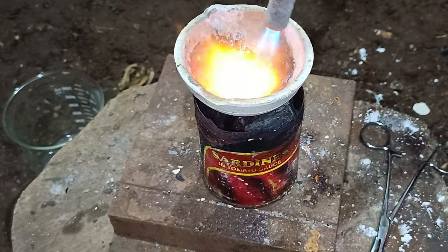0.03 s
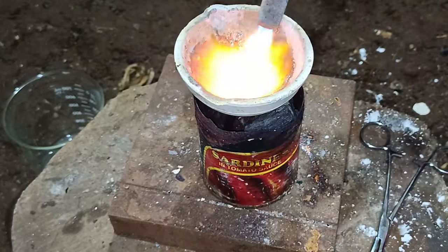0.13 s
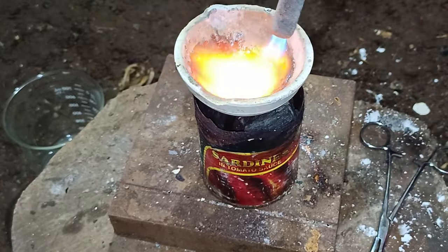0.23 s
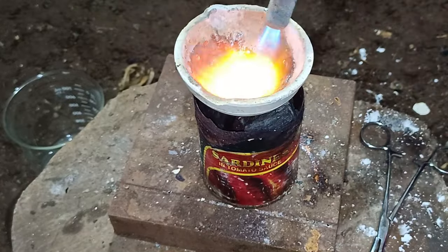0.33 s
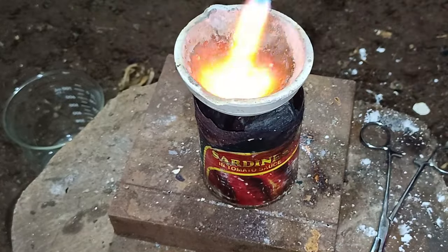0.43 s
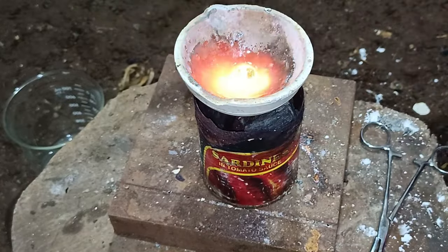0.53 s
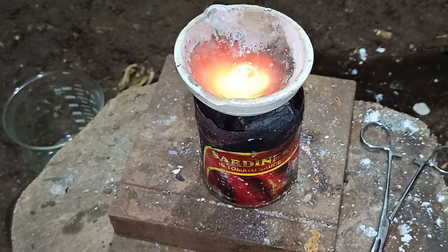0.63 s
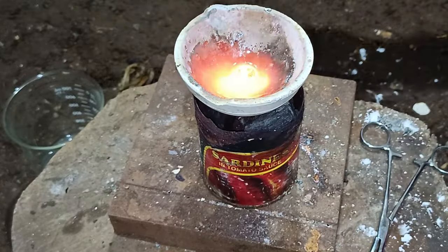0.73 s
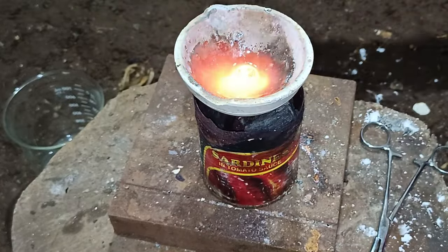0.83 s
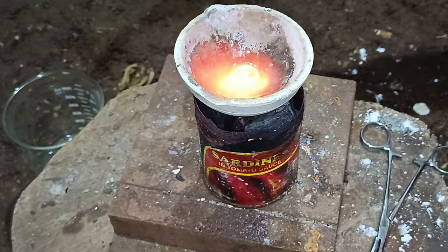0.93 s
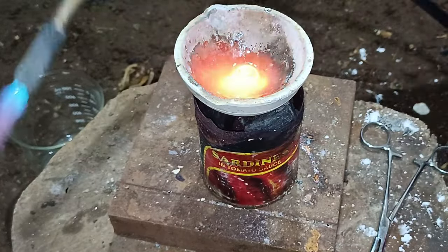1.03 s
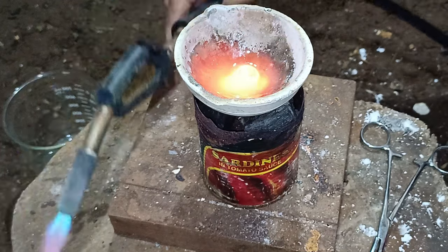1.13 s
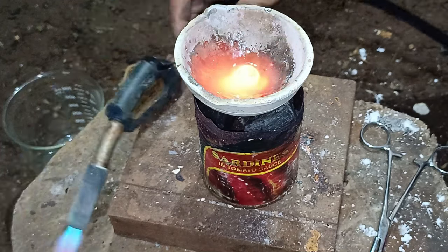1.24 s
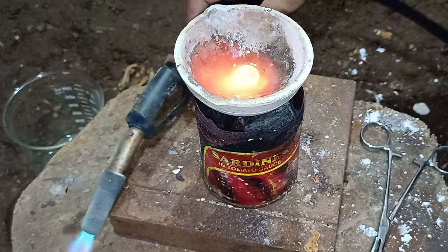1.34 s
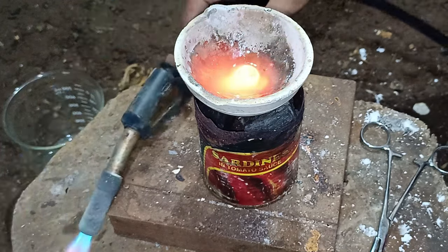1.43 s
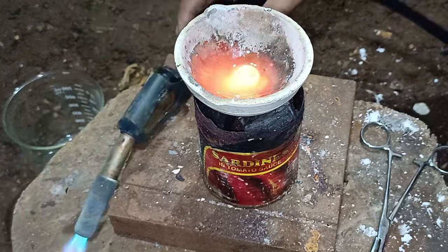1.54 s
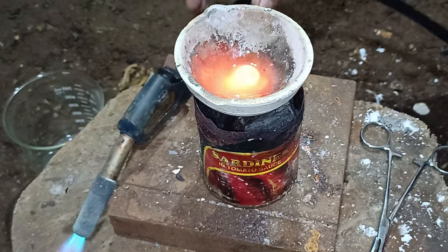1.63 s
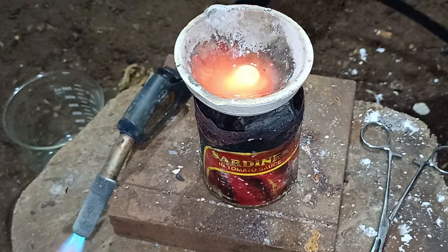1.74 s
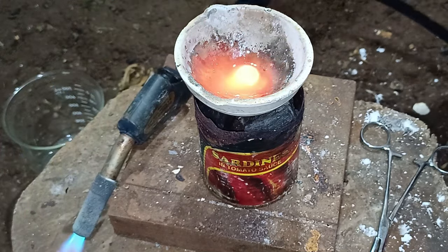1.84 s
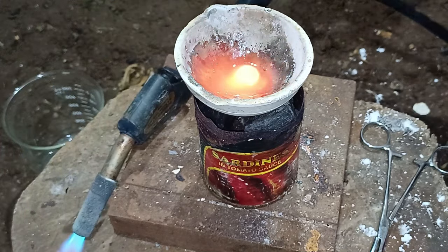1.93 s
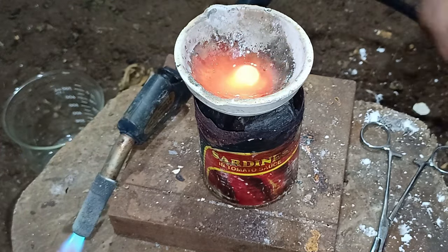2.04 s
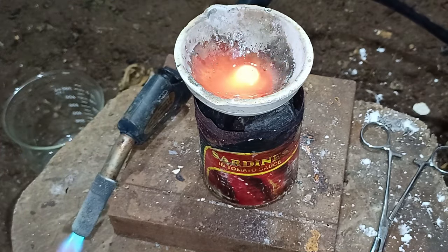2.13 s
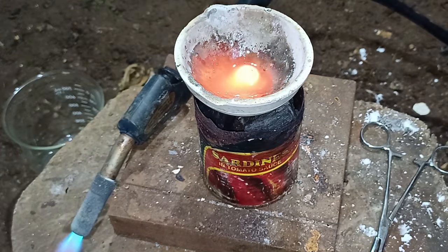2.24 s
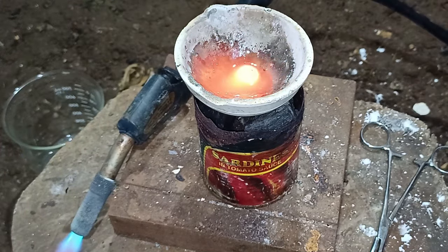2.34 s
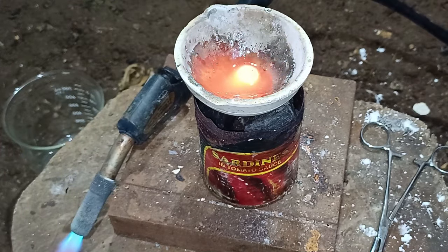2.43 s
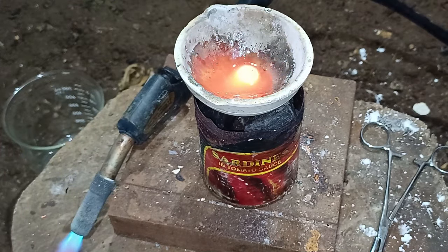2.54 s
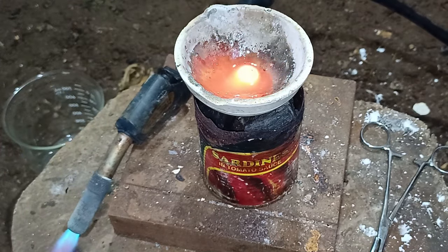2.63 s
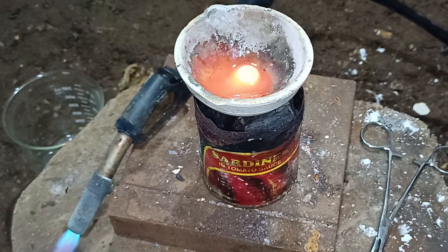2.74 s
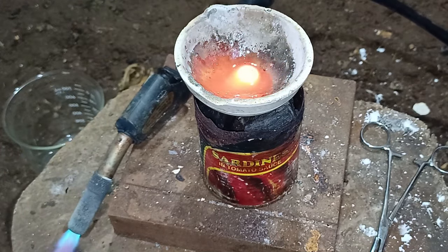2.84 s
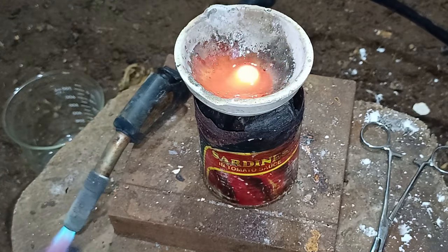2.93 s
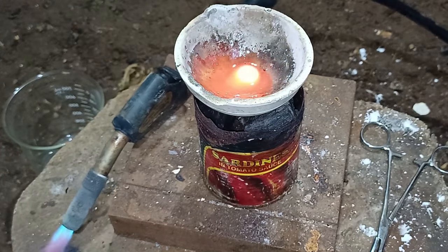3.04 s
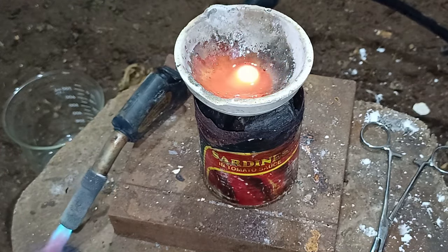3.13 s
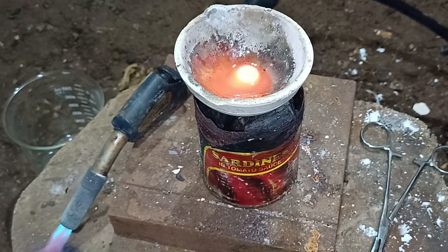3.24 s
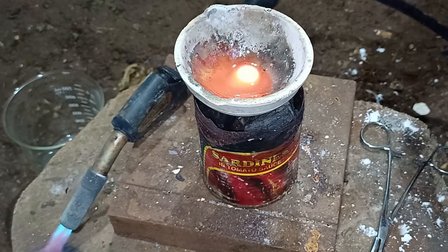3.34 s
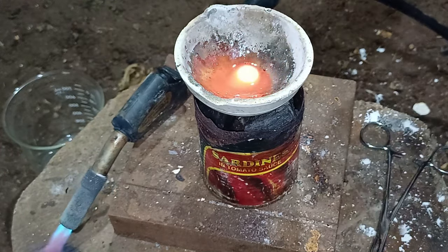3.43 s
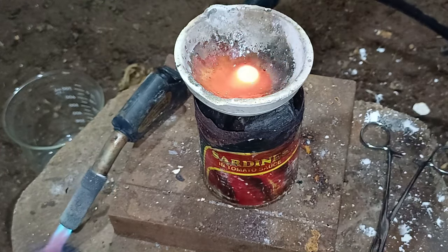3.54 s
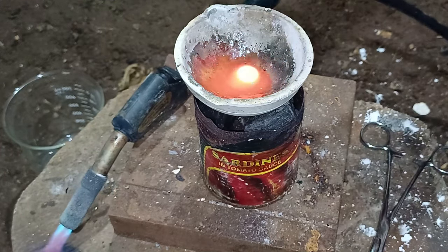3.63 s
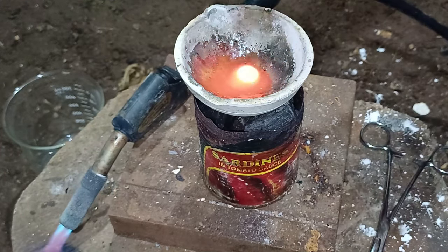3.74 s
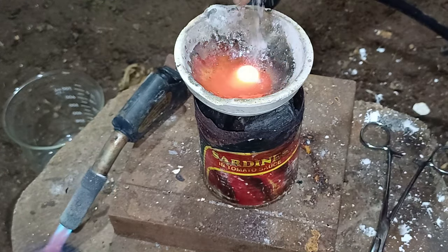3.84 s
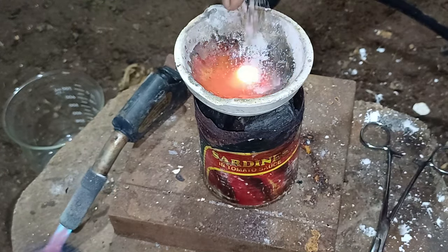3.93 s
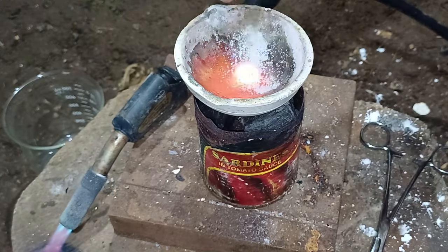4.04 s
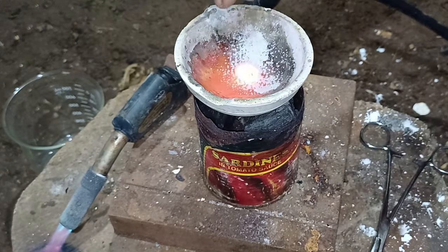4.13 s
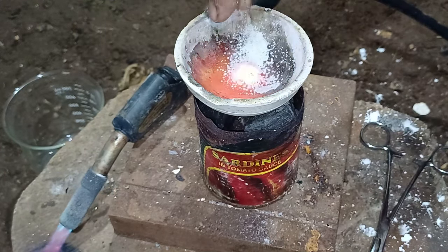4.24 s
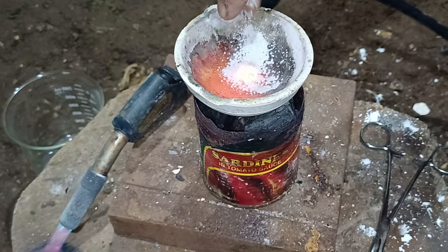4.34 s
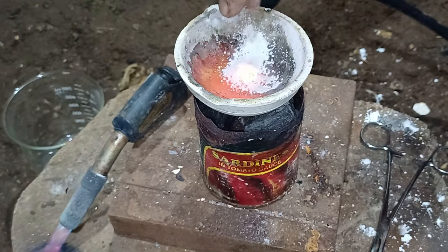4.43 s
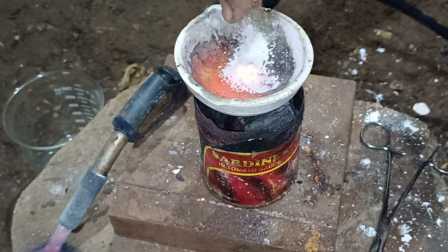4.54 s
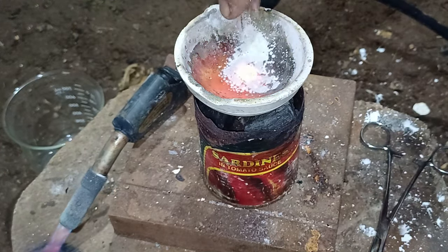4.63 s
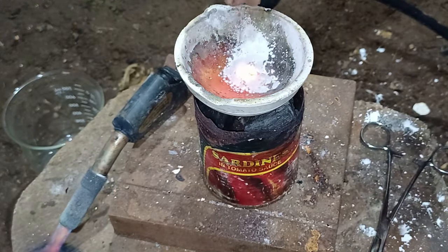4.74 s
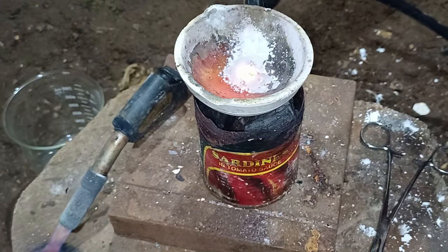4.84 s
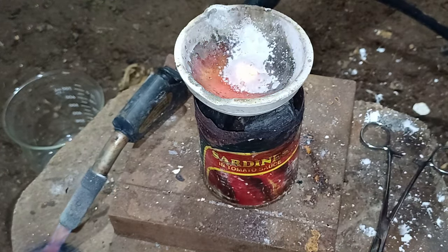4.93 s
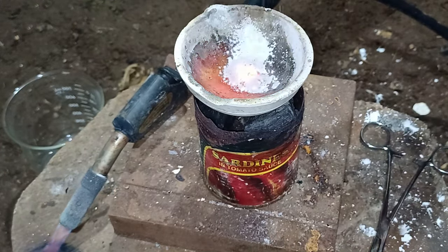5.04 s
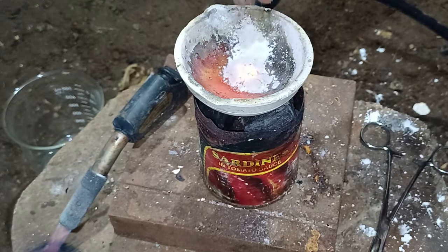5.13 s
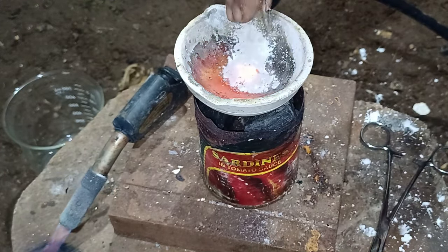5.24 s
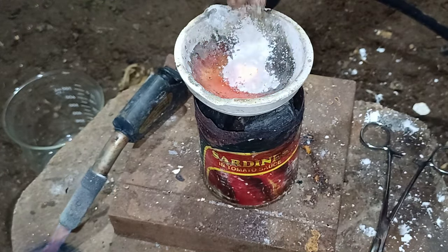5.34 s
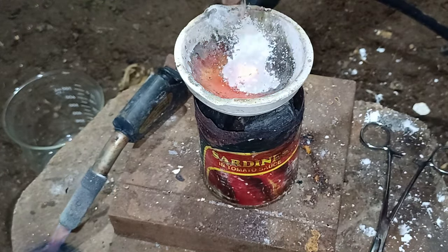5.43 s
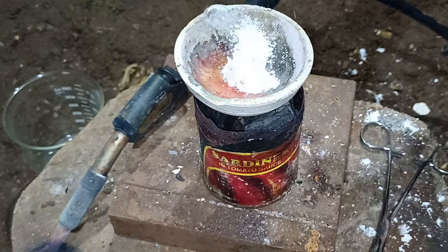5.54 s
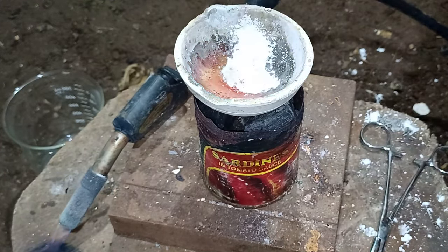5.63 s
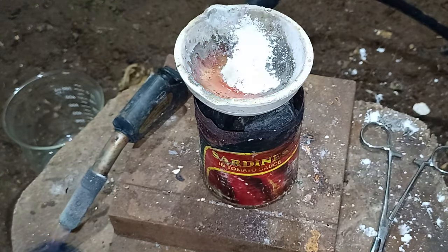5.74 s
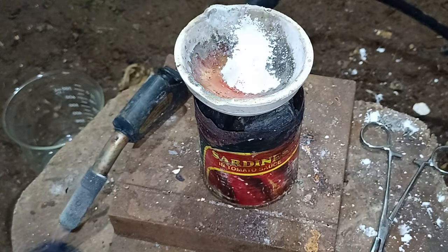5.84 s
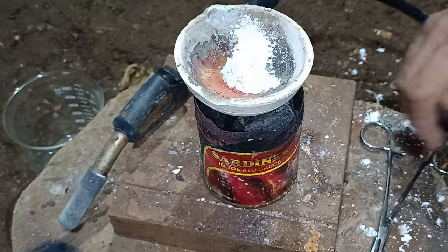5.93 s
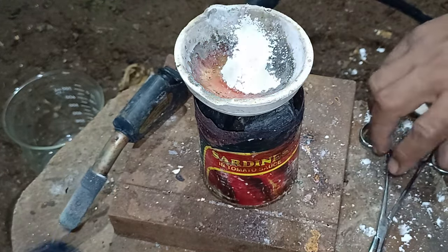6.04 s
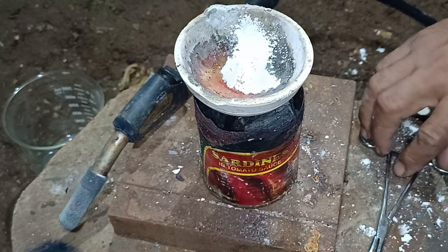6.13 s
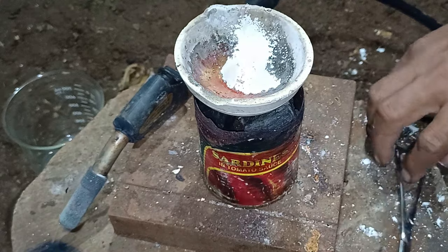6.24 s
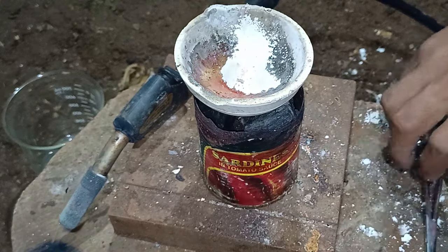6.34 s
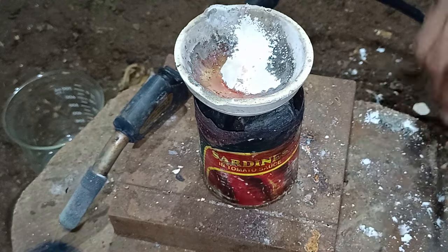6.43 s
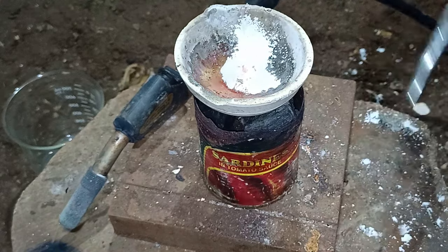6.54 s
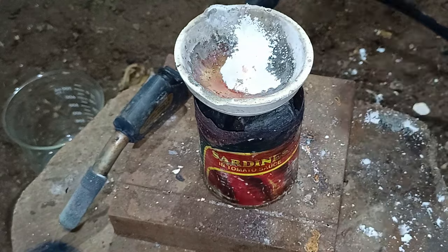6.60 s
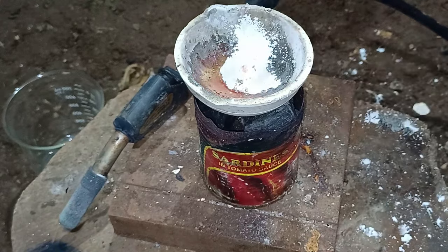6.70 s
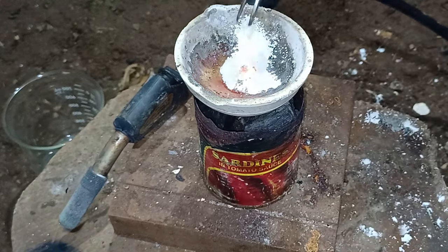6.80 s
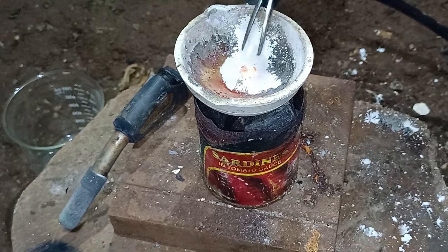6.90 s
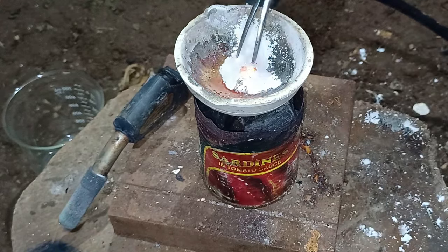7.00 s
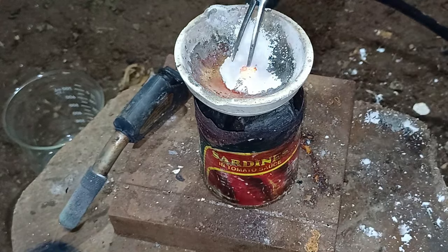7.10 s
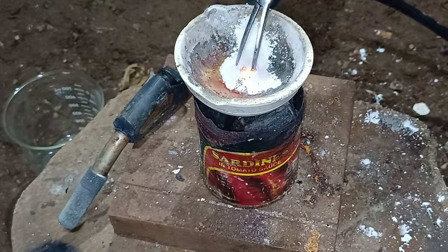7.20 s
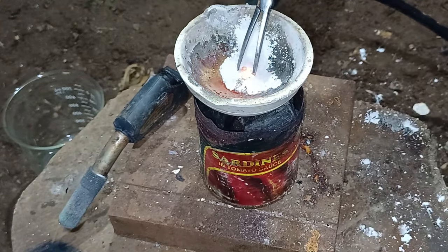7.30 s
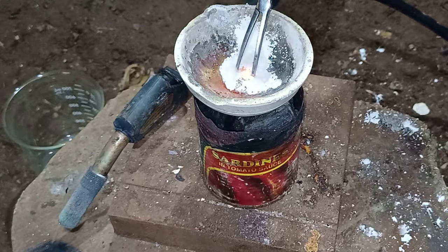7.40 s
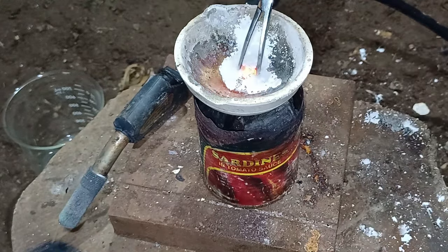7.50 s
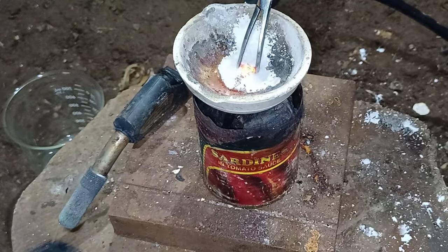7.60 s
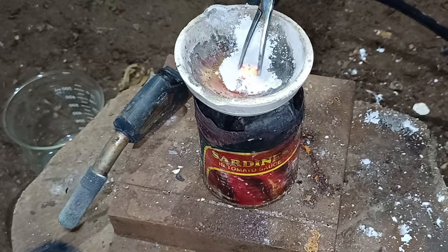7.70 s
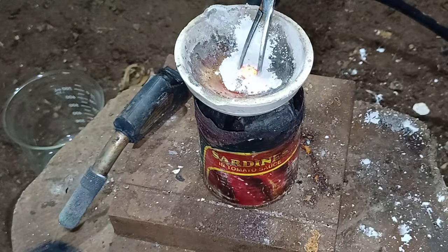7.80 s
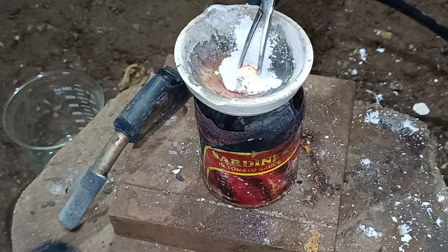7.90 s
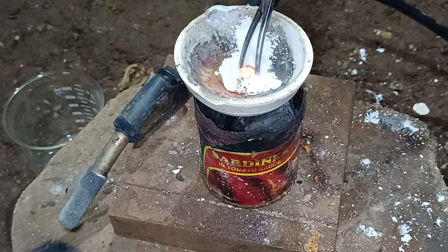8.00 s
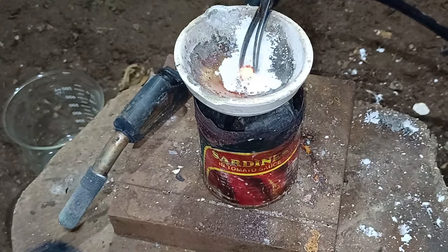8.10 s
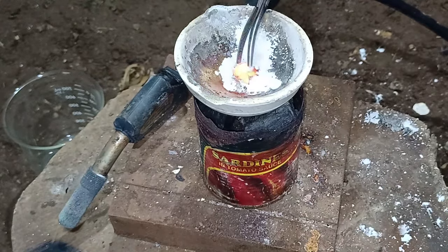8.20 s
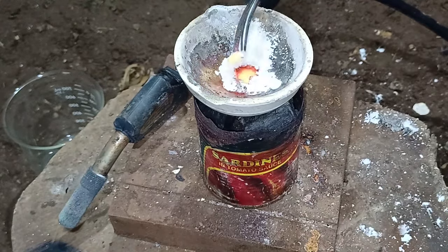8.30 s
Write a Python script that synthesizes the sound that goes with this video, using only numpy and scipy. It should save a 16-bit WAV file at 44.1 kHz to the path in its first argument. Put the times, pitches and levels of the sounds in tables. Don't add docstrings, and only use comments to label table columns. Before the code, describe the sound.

A bright flame roar fills the first half second, then shifts in colour as the torch is moved and set down. It burns steadily, weakening, with a wavering faint whistle. After an abrupt loudness step the rumble sinks, a pure falling tone swells and cuts off. Quiet follows: throbbing distant engine, airy hiss, small dry ticks of tongs on stone and crucible. Outdoor yard, near stereo pickup.

```python
import sys
import numpy as np
from scipy import signal
from scipy.fft import rfft, irfft, next_fast_len
from scipy.io import wavfile

SR = 44100
rng = np.random.default_rng(int(sys.argv[2]) if len(sys.argv) > 2 else 0)


def gain_from_db(level_db):
    decades = np.asarray(level_db, float) / 20
    return 10 ** decades


def wav_record(signal):
    frames = np.transpose(np.atleast_2d(signal))
    bounded = np.clip(frames, -1, 1)
    quanta = np.round(bounded * 32767).astype(np.int16)
    wavfile.write(sys.argv[1], SR, quanta)


N = 368676
OUT_S, OUT_DB_PER_S = 5.153, 954


def in_time(*tables):
    rows = [row for table in tables for row in table]
    s, *columns = np.transpose(rows)
    return [np.interp(np.arange(N) / SR, s, column) for column in columns]


def since(s):
    return np.maximum(np.arange(N) / SR - s, 0)


def sounding(table, rise_s, fall_s):
    t = np.arange(N) / SR
    rise = (t - table[0][0]) / rise_s
    fall = (table[-1][0] - t) / fall_s
    return np.sqrt(np.clip(np.minimum(rise, fall), 0, 1))


def at_hz(points, hz):
    table_hz, value = np.transpose(points)
    return np.interp(np.log(hz), np.log(table_hz), value)


def rms_one(x):
    return x / np.sqrt(np.mean(np.abs(x) ** 2) + 1e-20)


def drift(rate, count=N):
    r = np.exp(-80 * np.pi * rate / SR)
    noise = rng.standard_normal(count // 40 + 2002)
    slow = signal.lfilter([1], [1, -2 * r, r * r], noise)[2000:]
    return np.interp(np.arange(count) / 40, np.arange(len(slow)), rms_one(slow))


def yard(hz, echo_db):
    lags_s = rng.uniform(.003, .022, (8, 1, 1)) + rng.normal(0, 1, (8, 2, 1)) * .00004
    signs = rng.choice([-1, 1], (8, 1, 1))
    echoes = (signs * np.exp(-2j * np.pi * hz * lags_s)).sum(axis=0)
    gain = gain_from_db(echo_db) * np.clip(hz / 1500, 0, 1)
    return (1 + gain * echoes) / np.sqrt(1 + 8 * gain ** 2)


def turbulence(colour, peaks, alike, lag_s, count, gust_db, patchy_db):
    size = next_fast_len(count)
    hz = np.maximum(np.arange(size // 2 + 1) * SR / size, 1.)
    above_octaves = np.maximum(np.log2(hz / colour[-1][0]), 0)
    below_octaves = np.maximum(np.log2(colour[0][0] / hz), 0)
    shape_db = np.tile(at_hz(colour, hz) - 24 * (above_octaves + below_octaves), (2, 1))
    for centre, width, *db in peaks:
        shape_db += np.array(db)[:, None] / (1 + ((hz - centre) / (width / 2)) ** 2)

    shared, left, right = rfft(rng.standard_normal((3, size)))
    like = np.clip(at_hz(alike, hz), 0, 1)
    late = np.exp(-2j * np.pi * hz * lag_s)
    together = np.sqrt(like) * shared * np.array([late ** 0, late])
    apart = np.sqrt(1 - like) * np.array([left, right])
    ports = (together + apart) * gain_from_db(shape_db) * yard(hz, echo_db=-16.5)

    gust = 0.68 * drift(62, count) + 0.81 * drift(120, count)
    centres = 30 * 2 ** np.arange(0, 9.6, .5)
    centres = centres[centres < 2 * colour[-1][0]]
    bands = np.zeros((len(centres), 2, count))
    for k, centre in enumerate(centres):
        window = np.cos(np.pi * np.clip(np.log2(hz / centre), -.5, .5)) ** 2
        bright = np.clip(np.log2(centre / 300) / 4, .2, 1)
        flicker = gain_from_db(gust_db * bright * gust + patchy_db * drift(31, count))
        bands[k] = irfft(ports * window, size)[:, :count] * flicker
    return centres, bands


def flame(curve, jet_db, jet_per_sharp_db, colour, peaks, lag_s, fade_s):
    # hz, likeness (0-1)
    flame_alike = [(60, 0.94), (500, 1), (1400, 0.93), (3000, 0.8), (6000, 0.86), (10000, 0.2)]
    zones_hz = [160, 800, 2700, 8000]
    start, stop = round(curve[0][0] * SR), round(curve[-1][0] * SR)
    strength_db, sharp_db = np.array(in_time(curve))[:, start:stop]
    levels_db = strength_db + np.array([0 * sharp_db, sharp_db, jet_db + jet_per_sharp_db * sharp_db])

    centres, bands = turbulence(colour, peaks, flame_alike, lag_s, stop - start, gust_db=1.39, patchy_db=0.9)
    power = np.mean(bands.mean(axis=1) ** 2, axis=1)
    zone_db = []
    for low, high in zip(zones_hz, zones_hz[1:]):
        inside = (centres >= low) & (centres < high)
        zone_db.append(10 * np.log10(power[inside].sum()))
    gains_db = levels_db - np.array(zone_db)[:, None]

    middles = np.log(np.sqrt(np.multiply(zones_hz[1:], zones_hz[:-1])))
    out = np.zeros((2, N))
    for centre, band in zip(centres, bands):
        share = [np.interp(np.log(centre), middles, row) for row in np.eye(3)]
        out[:, start:stop] += band * gain_from_db(np.dot(share, gains_db))
    return out * sounding(curve, *fade_s)


def tone(hz, level_db, rough, wander_hz, own=0.2, multiple=1):
    rough, own = np.clip(rough, 0, 1), np.clip(own, 0, 1)
    common, left, right = [drift(wander_hz) + 1j * drift(wander_hz) for k in range(3)]
    noise = np.sqrt(1 - own) * common + np.sqrt(own) * np.array([left, right])
    shake = np.sqrt(1 - rough) + np.sqrt(rough / 2) * noise
    turning = np.exp(2j * np.pi * multiple * np.cumsum(hz) / SR)
    return np.sqrt(2) * gain_from_db(level_db) * np.real(shake * turning)


def swells(rows, between_db, edge_db_per_s, sag_db_per_s):
    t = np.arange(N) / SR
    level_db = np.full(N, float(between_db))
    pitch_points = []
    for s, length, db, hz in rows:
        rise_db = edge_db_per_s * np.maximum(s - t, 0)
        fall_db = edge_db_per_s * since(s + length)
        level_db = np.maximum(level_db, db - rise_db - sag_db_per_s * since(s) - fall_db)
        pitch_points += [(s, hz), (s + length, hz)]
    hz, = in_time(sorted(pitch_points))
    return hz, level_db


def blast():
    # time_s, strength_db, sharpness_db
    blast_curve = [
        (0.0, -35, 3),
        (.11, -37, 3.5),
        (.15, -33.5, 4.5),
        (.4, -33.5, 4),
        (.55, -32.5, -2),
        (.62, -28, -17),
    ]
    # hz, level_db (per Hz)
    blast_colour = [(40, -32), (110, -7.5), (400, -4), (1500, -0.5), (3000, -9), (5000, -26), (8500, -31.5)]
    # centre_hz, width_hz, left_db, right_db
    blast_peaks = [(197, 32, -17, -14), (451, 450, 7.5, 3.5), (716, 170, -20, -5.5), (826, 85, 10, 0),
                   (935, 89, -6, -6), (1740, 240, 3, 7.5), (2040, 790, -9, -7.5), (2060, 130, -3, -10),
                   (2256, 350, 12, 12), (2550, 230, -5, 0), (3480, 330, 1, 6), (4280, 170, -2.0, 8.5),
                   (5500, 650, 8, 6.5), (7900, 2700, -5, 4)]
    return flame(blast_curve, -10, 2.57, blast_colour, blast_peaks, lag_s=0.000081, fade_s=(.001, .12))


def hiss():
    # time_s, level_db
    hiss_curves = [
        [(0, -54.5), (.25, -47), (.6, -51), (1.5, -49), (2.7, -49), (3.45, -55.5), (3.7, -59), (3.956, -58)],
        [(3.958, -46), (4.5, -45.5), (4.72, -48), (4.85, -44.5), (5.2, -47), (5.86, -49.5), (6.2, -48),
         (7.35, -49), (7.9, -46), (8.36, -47.5)],
    ]
    # hz, level_db (per Hz)
    hiss_colour = [(200, 3.5), (350, 2.5), (650, -22.5), (1000, -22.5), (2300, -2), (6000, -15.5),
                   (11000, -3.5), (15500, -8.5)]
    # centre_hz, width_hz, left_db, right_db
    hiss_peaks = [(393, 283, -11.5, -15.5), (579, 73, -2, 1), (1160, 150, 5, -0.5), (1380, 170, -5, -3),
                  (1525, 160, 3, -8), (1530, 450, -2.5, 7.5), (1970, 180, -1.5, -2), (2070, 66, -10, -12),
                  (2604, 270, -6.5, -5.5), (4490, 2100, -4.5, 1.5), (5400, 1200, 15, 2),
                  (5540, 320, -21, 3), (7740, 1300, -5.5, 5), (11700, 6900, -0.5, -3)]
    # hz, likeness (0-1)
    hiss_alike = [(500, 0.34), (1500, 0.57), (2300, 0.96), (5000, 0.57), (10000, 0.12), (15000, 0.3)]
    # centre_hz, sharpness (no unit), depth (0-1)
    hollow = (8600, 10, 0.31)
    level_db, = in_time(*hiss_curves)
    centres, bands = turbulence(hiss_colour, hiss_peaks, hiss_alike, .00006, N, gust_db=1.4, patchy_db=1.0)
    top = np.sqrt(np.mean(bands[centres > 9000].sum(axis=0) ** 2))
    air = bands.sum(axis=0) / top
    hollow_hz, sharpness, depth = hollow
    before = sounding(hiss_curves[0], 2.1, .001)
    b, a = signal.iirpeak(hollow_hz, sharpness, fs=SR)
    air = air - depth * before * signal.lfilter(b, a, air)
    return air * gain_from_db(level_db + 3.5)


def swung():
    # time_s, strength_db, sharpness_db
    swing_curve = [
        (.48, -32, -4.5),
        (.7, -36, 1),
        (.85, -36.5, -0.5),
        (1.0, -33.5, -1.5),
        (1.2, -31, -9),
    ]
    # hz, level_db (per Hz)
    swing_colour = [(40, -31), (110, -4), (300, -2), (700, -2), (1500, -5.5), (3000, -11.5), (6000, -29.5),
                    (8800, -32)]
    # centre_hz, width_hz, left_db, right_db
    swing_peaks = [(190, 40, -1, 0.5), (352, 63, -3.5, -10), (454, 110, 6, 5), (800, 120, -6, -2),
                   (1430, 200, 3.5, 6), (2220, 200, 4, 0), (2620, 260, -9, -1), (5500, 430, 2, 7.5)]
    # time_s, lag_ms
    ground_echo = [
        (.48, 2.2),
        (.62, 2.3),
        (.7, 1.85),
        (.8, 1.53),
        (.87, 1.1),
        (.93, 1.44),
        (.98, 2.25),
        (1.2, 2.44),
    ]
    direct = flame(swing_curve, -5, 0.18, swing_colour, swing_peaks, lag_s=0.00018, fade_s=(.1, .15))
    late_ms, = in_time(ground_echo)
    where = np.arange(N) - late_ms * SR / 1000
    echo = np.array([np.interp(where, np.arange(N), port) for port in direct])
    dull = signal.sosfilt(signal.butter(1, 600, fs=SR, output='sos'), echo)
    return (direct + 0.15 * echo + 0.41 * dull) * gain_from_db(-2.0)


def lying():
    # time_s, strength_db, sharpness_db
    lying_curve = [
        (1.0, -32.5, -6.5),
        (1.2, -32.5, 0.5),
        (1.5, -32, .5),
        (2.4, -33, 0),
        (2.7, -34.5, 1.6),
        (3.04, -34, -2),
        (3.5, -33.5, -7),
        (3.957, -33.5, -11.5),
    ]
    # hz, level_db (per Hz)
    lying_colour = [(40, -42.5), (110, -3.5), (300, 2), (700, -6.5), (1500, -5.5), (3000, -7.5),
                    (6000, -20), (8800, -40.5)]
    # centre_hz, width_hz, left_db, right_db
    lying_peaks = [(40, 28, 22, 27), (192.7, 22, -16, -25), (329, 33, -7.5, -19), (455, 24, 6, 0.5),
                   (682, 230, 13.5, 10.5), (796, 60, 2.5, -12.5), (935, 290, -5, 17.5), (1012, 39, -5, -5),
                   (1103, 394, 7, -11), (1240, 193, 6, 12.5), (1567, 400, 10, 11), (1770, 280, -2.5, -2),
                   (2160, 59, 11, 7.5), (2380, 330, -1.5, 12.5), (2626, 210, -9, -8.5),
                   (2590, 1300, 1.5, -5.5), (3250, 360, -10, 2), (3910, 420, -4.5, -4),
                   (4590, 570, -11, -5), (5360, 170, 6.5, -22), (5500, 680, -9.5, 4.5),
                   (6140, 540, -3.5, -8.5), (7040, 620, -4, 8), (7450, 880, -4, -9), (9600, 130, 17, -26)]
    roar = flame(lying_curve, -2.15, 0.48, lying_colour, lying_peaks, lag_s=0.00013, fade_s=(.2, .001))
    treble = signal.sosfilt(signal.butter(1, 3940, 'high', fs=SR, output='sos'), roar)
    shadow = 0.65 * np.clip(1 - since(1.45) / 0.078, 0, 1)
    return roar - shadow * treble


def whistle():
    # time_s, pitch_hz, level_db
    loose_curve = [(2.95, 965, -54), (3.12, 968, -52), (3.19, 978, -45), (3.27, 955, -44), (3.45, 962, -46),
                   (3.64, 955, -41), (3.72, 930, -48), (3.93, 943, -47), (3.97, 950, -44), (4.05, 968, -46),
                   (4.14, 968, -42.5), (4.22, 950, -46.5), (4.3, 942, -46), (4.39, 932, -41.5),
                   (4.44, 905, -54), (4.55, 890, -55), (4.6, 890, -60)]
    stepped = since(3.957) > 0
    hz, level_db = in_time(loose_curve)
    loose = tone(hz, level_db + 11 * stepped, .6 - .25 * stepped, wander_hz=28)
    loose = loose * sounding(loose_curve, .05, .03)

    lock_s, lock_hz, sag_hz_per_s, out_sag_hz_per_s = 4.743, 1029, 170, 530
    ceiling_db, start_under_db, growth_s = -21.5, 27.5, 0.23
    hz = lock_hz - sag_hz_per_s * since(lock_s) - out_sag_hz_per_s * since(OUT_S)
    hz = np.maximum(hz, lock_hz / 2)
    level_db = ceiling_db - start_under_db * np.exp(-since(lock_s) / growth_s)
    level_db = level_db - OUT_DB_PER_S * since(OUT_S)
    bloom_db = -38.5 - 6 * ((np.arange(N) / SR - 4.985) / 0.078) ** 4
    octave_db = np.maximum(bloom_db, level_db - 31)
    locked = tone(hz, level_db, .015, wander_hz=30) + tone(hz, octave_db, .04, wander_hz=30, multiple=2)
    locked = locked * sounding([[lock_s], [N / SR]], .12, 1 / SR)
    sides = np.array([[-1], [1]])
    return loose * gain_from_db(3.2 * sides) + locked * gain_from_db(2.2 * sides)


def starving():
    # time_s, strength_db, sharpness_db
    starving_curve = [(3.957, -26.5, -3), (4.1, -29.5, -1), (4.6, -33.5, -3.5), (4.67, -37, -3.5),
                      (4.75, -37, -3.5), (4.8, -41.5, 4), (4.9, -49.5, 11), (5.08, -53, 9),
                      (5.16, -55.5, 3.5), (5.2, -52, -2), (5.22, -50, -18), (5.29, -52, -16)]
    # hz, level_db (per Hz)
    starving_colour = [(40, -28), (110, -5.5), (300, -14), (700, -6), (1500, -7), (3000, -13), (6000, -8.5),
                       (8800, -43)]
    # centre_hz, width_hz, left_db, right_db
    starving_peaks = [(187, 30, -12, -9), (255.5, 104, 16, 11.5), (429, 77, 9, 4.5), (650, 240, 8, 4.5),
                      (950, 81, 11, 13), (1035, 43, -7, -6), (1087, 490, -17, -7), (1193, 260, 16.5, 2.5),
                      (1770, 430, 4, -3), (1774, 110, -14, -5), (2470, 200, 6.5, 8.5), (2700, 280, -7, -12),
                      (3270, 420, -5, 4), (3620, 230, 9.5, 2.5), (4500, 400, 12, 14),
                      (4620, 230, -6.5, -8.5), (4690, 2150, -17.5, -14), (5330, 220, -5, -9),
                      (6340, 330, -11, -21), (7350, 2200, -7, 1.5), (8900, 300, 18, 0)]
    dying = flame(starving_curve, -5, 1.4, starving_colour, starving_peaks, lag_s=0.00013, fade_s=(.0003, .05))
    afterglow_db = 5
    return dying * gain_from_db(-np.minimum(OUT_DB_PER_S * since(OUT_S), afterglow_db))


def engine():
    # start_s, length_s, level_db, pitch_hz
    hum_swells = [(4.54, 0.02, -32, 121), (4.58, .03, -36, 126), (4.66, 0.15, -35.5, 131),
                  (4.84, .15, -39.5, 130), (5.055, 0.017, -38, 128), (5.12, 0.05, -46, 120),
                  (5.19, 0.041, -44, 131), (5.34, .05, -48, 129), (5.44, .12, -45.5, 132),
                  (5.6, .03, -46, 131), (5.7, .1, -47.5, 130), (5.97, 0.054, -42.5, 122.3),
                  (6.07, 0.17, -39.5, 125.5), (6.34, 0.031, -37, 124.4), (6.46, 0.057, -37.5, 125.6),
                  (6.59, 0.052, -34, 125.2), (6.69, 0.18, -35.5, 123.2), (6.9, 0.17, -34.5, 122.7),
                  (7.12, .03, -40, 125.9), (7.27, 0.045, -41.5, 117.9), (7.35, .13, -38, 118.5),
                  (7.545, 0.033, -35, 120.8), (7.62, .11, -35, 120), (7.77, 0.076, -35, 121.1),
                  (7.88, 0.076, -32, 120), (7.98, .05, -31.5, 121), (8.085, 0.025, -43, 123.8),
                  (8.17, 0.042, -38, 126.8), (8.26, 0.026, -33.5, 121), (8.33, 0.036, -33.5, 125.8)]
    # start_s, length_s, level_db, pitch_hz
    sub_swells = [(4.75, 0.12, -48, 58), (5.965, 0.17, -33, 60.6), (6.17, 0.23, -42.5, 59.5),
                  (6.66, 0.044, -47, 62), (6.8, 0.14, -48, 57.9), (7.01, 0.2, -49, 58.54),
                  (7.22, 0.19, -51, 58.2), (7.45, 0.079, -49, 56.94), (7.63, 0.038, -45, 59),
                  (7.75, 0.054, -34, 59.6), (7.88, .13, -34, 60.2), (8.11, 0.041, -37.5, 57.6),
                  (8.25, 0.041, -51, 55.5)]
    # hz, level_db (per Hz)
    rumble_colour = [(12, -44), (20, -13), (80, -5), (130, 1.5), (155, -1.5), (190, -24.5), (312, -33),
                     (500, -47), (650, -68), (1100, -120)]
    # hz, likeness (0-1)
    rumble_alike = [(40, 0.6), (130, 0.65), (400, 0.45)]
    hz, level_db = swells(hum_swells, between_db=-50.5, edge_db_per_s=560, sag_db_per_s=2.2)
    sub_hz, sub_db = swells(sub_swells, between_db=-57, edge_db_per_s=530, sag_db_per_s=24)
    upper = tone(hz, level_db, 0.083, wander_hz=8.4) * gain_from_db(np.array([[.9], [-.9]]))
    lower = tone(sub_hz, sub_db, 0.03, wander_hz=4.5) * gain_from_db(np.array([[-.6], [.6]]))
    centres, bands = turbulence(rumble_colour, [], rumble_alike, 0, N, gust_db=-0.5, patchy_db=5.0)
    swell = gain_from_db(-44.5 + 0.22 * (level_db + 42.0) + 0.33 * (sub_db + 46.5))
    rumble = swell * rms_one(bands.sum(axis=0))
    fade_in = np.sqrt(np.minimum(since(4.47) / .08, 1))
    return fade_in * (upper + lower + rumble)


def tongs():
    # start_s, peak_db, scrape_length_s, brightness_db (per octave), tick_db
    knocks = [(5.993, -60, .006, 8, -62), (6.032, -41, .008, -15, -66), (6.1, -60, .03, 8, -66),
              (6.14, -59, .012, 8, -62), (6.18, -42, 0.0059, -3, -60), (6.253, -58, .008, 10, -62),
              (6.277, -45, .008, -2, -56), (6.3, -55, .02, 8, -64), (6.333, -46, .006, -7, -60),
              (6.602, -56, 0.0061, 10, -60), (6.651, -60, 0.0046, 10, -62), (7.215, -54, 0.0018, 3, -46),
              (7.283, -62, .004, 10, -60), (7.659, -60, .015, 10, -66), (7.701, -48, .01, 6, -56),
              (7.725, -48, 0.0067, 4, -56), (7.78, -57, .012, 10, -64), (7.945, -58, .01, 15, -56),
              (7.969, -51, .012, 10, -62), (7.996, -51, .015, 12, -62), (8.03, -55, 0.013, 12, -64)]
    # pitch_hz, level_db, ring_s (time to fall 60 dB)
    steel = [(597, -6, 0.043), (700, -16, .012), (850, -7, .012), (980, -5, 0.013), (1130, 3, 0.024),
             (1260, -6, .012), (1500, 2, .01)]
    t, out = np.arange(N) / SR, np.zeros(N)
    grit = rng.standard_normal(N)
    for s, peak_db, length, high_db, tick_db in knocks:
        span = slice(round(s * SR), round((s + .02) * SR))
        age = t[span] - t[span][0]
        out[span] += gain_from_db(tick_db + 6) * np.exp(-age / .0012) * grit[span]
    out = signal.sosfilt(signal.butter(2, [400, 5000], 'band', fs=SR, output='sos'), out + 1e-18)

    for hz, level_db, ring_s in steel:
        touch = np.full(N, 1e-18)
        for s, peak_db, length, high_db, tick_db in knocks:
            span = slice(round(s * SR), round((s + .2) * SR))
            age = t[span] - t[span][0]
            shape = np.minimum(age / 0.0018, 1) * np.exp(-(age / max(length, .002) / 2.2) ** 2)
            push_db = peak_db - 32.5 + high_db * np.log2(hz / 800)
            touch[span] += gain_from_db(push_db) * shape * grit[span]
        r, w = gain_from_db(-60 / (ring_s * SR)), 2 * np.pi * hz / SR
        ring = signal.lfilter([0, np.sin(w)], [1, -2 * r * np.cos(w), r * r], touch)
        out += gain_from_db(level_db) * ring
    return out * gain_from_db(np.array([[-1.5], [1.5]]))


def scene():
    torch = blast() + swung() + lying() + starving() + whistle()
    return torch + hiss() + engine() + tongs()


def top_cut(x):
    return signal.sosfilt(signal.butter(12, 15900, fs=SR, output="sos"), x)


def record(dry):
    size = next_fast_len(N)
    hz = np.arange(size // 2 + 1) * SR / size
    below = np.clip((15870 - hz) / 120, .0005, 1)
    mix = irfft(rfft(dry, size) * below, size)[:, :N]
    return top_cut(mix)


dry = scene()
out = record(dry)
wav_record(out)
```